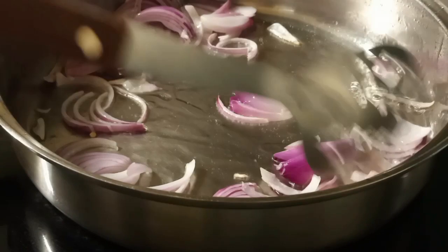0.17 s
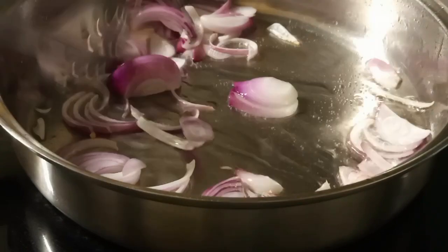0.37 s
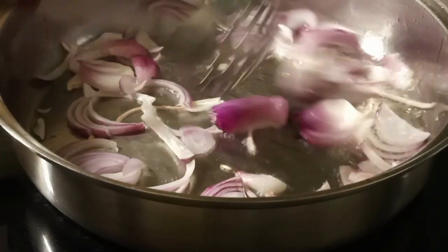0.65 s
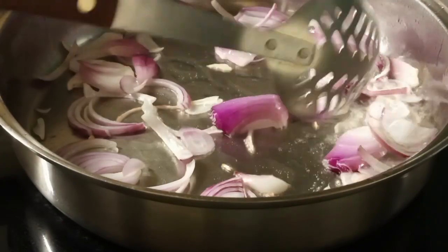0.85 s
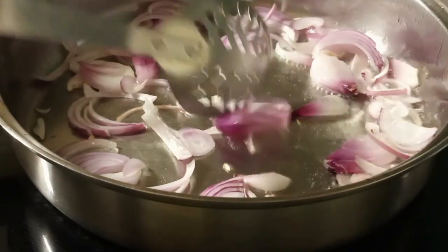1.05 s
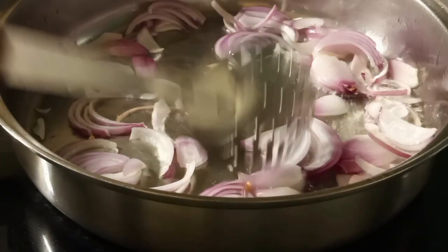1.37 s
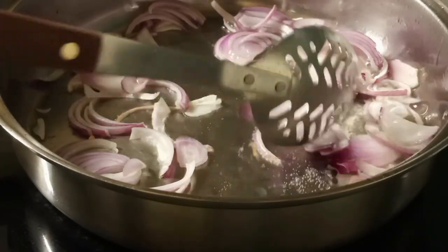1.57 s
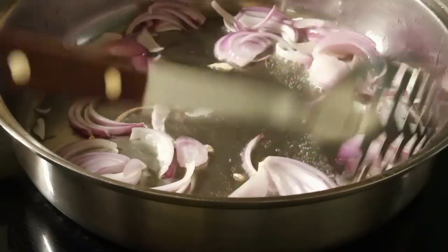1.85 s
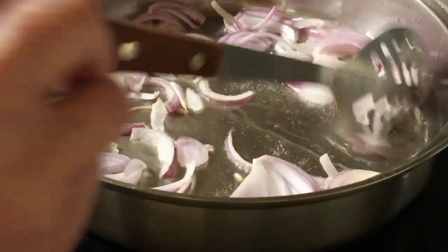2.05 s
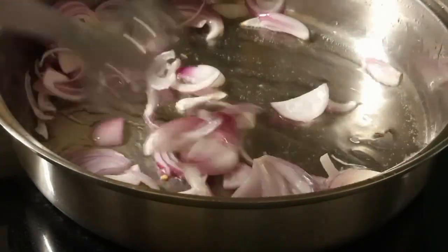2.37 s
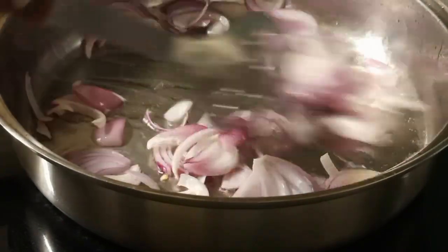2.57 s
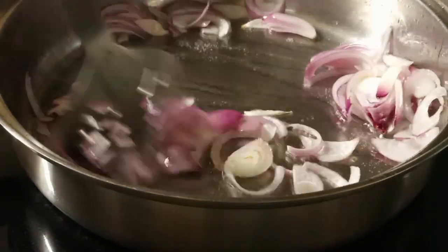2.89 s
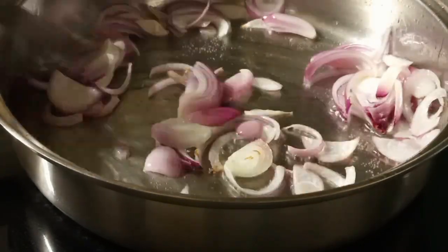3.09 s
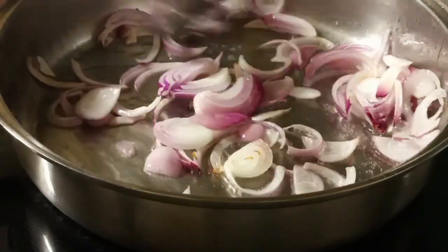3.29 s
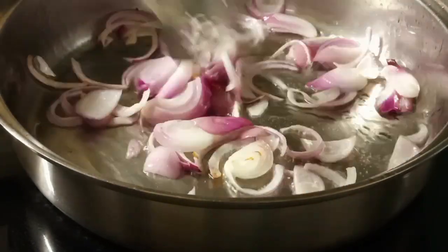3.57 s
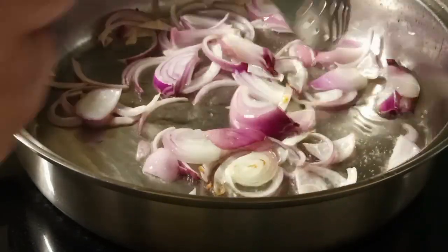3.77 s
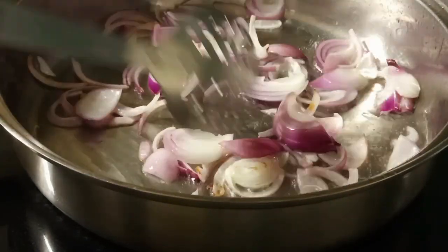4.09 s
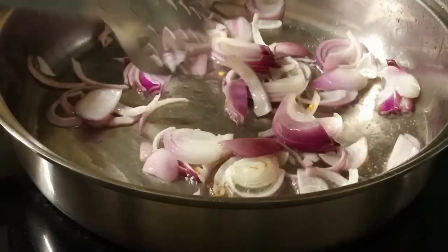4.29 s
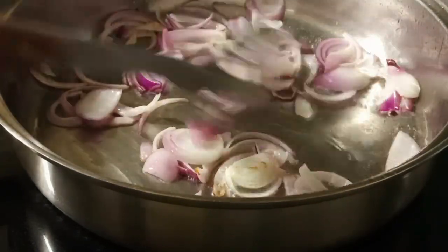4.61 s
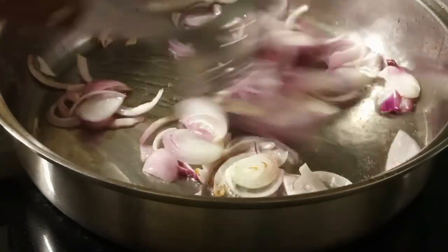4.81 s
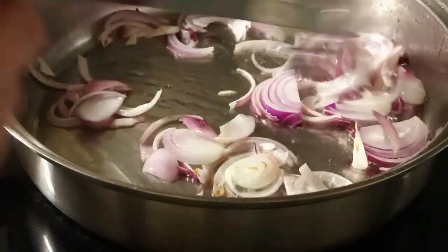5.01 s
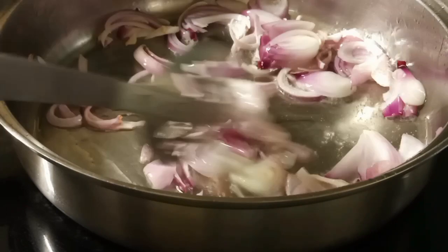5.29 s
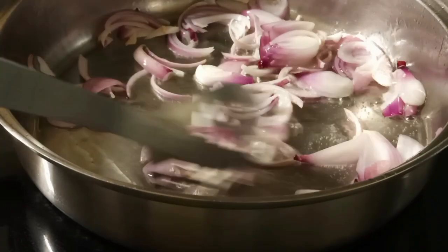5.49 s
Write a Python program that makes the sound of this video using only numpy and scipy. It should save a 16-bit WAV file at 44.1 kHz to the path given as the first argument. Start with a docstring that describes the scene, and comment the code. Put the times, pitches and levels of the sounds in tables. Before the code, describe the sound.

Sliced onions sizzle brightly in hot fat in a steel pan while a metal skimmer clinks, scrapes and shifts the pan on the stove.

```python
"""Small kitchen, close to the stove, two unlike microphones: the right one loses the top of the treble.
Sliced onions fry in a wide steel pan: hissing noise, bursting bubbles, crackles and loud spits of fat.
A slotted steel skimmer taps, pushes and scrapes: contact bursts drive the modes of pan wall and blade.
The pan grinds and squeaks on its stand as gritty noise bands, and dull bumps thud through the stove top.
Behind are short sparse reflections and a steady noise hum."""
import sys
import numpy as np
from scipy import signal
from scipy.fft import rfft, irfft
from scipy.io import wavfile
from scipy.ndimage import uniform_filter1d

SR = 44100
rng = np.random.default_rng(int(sys.argv[2]) if len(sys.argv) > 2 else 0)


def log_audio(samples):
    """Write samples as a 16-bit WAV file to the path given in sys.argv[1]."""
    # one column per channel
    frames = np.atleast_2d(samples).T
    # limit to full scale, then quantise
    limited = np.clip(frames, -1, 1)
    pcm = np.round(limited * 32767).astype(np.int16)
    wavfile.write(sys.argv[1], SR, pcm)


N = 249165

# Frying spectrum before the low fizz is added: hz [Hz], density_db [dB per Hz, relative]
FRYING_SPECTRUM = [(900, -31.5), (2000, -25), (3000, -15), (4000, -9), (5500, -4), (7000, -3.5), (8300, -4),
                   (9200, 5), (11000, -5), (13800, -17.5), (14400, -9.5), (15200, -1)]
# Lower fizz coming and going against the rest of the frying: time_s [s], level_db [dB]
LOW_FIZZ_LEVELS = [(0, 7), (.33, 6.5), (.82, 11), (1.5, 3.5), (2.0, 8), (2.4, 4.5), (2.6, 12.5),
                   (3.07, 7.5), (3.3, 6), (3.7, 6), (3.9, 6.5), (4.35, 7.5), (5.3, 7.5), (5.65, 18)]
# Loud spits of fat: start_s [s], peak_db [dB, main burst], centre_hz [Hz], burst_ms [ms, decay to 1/e]
FAT_SPITS = [(0.064, -22, 4120, 2.7), (0.376, -14.5, 8800, 2), (0.46, -18, 9350, 1.6),
             (1.5506, -24, 4800, 2.2), (1.9492, -25, 4770, 3), (1.997, -14.5, 8950, 1.6),
             (2.222, -18, 9080, 1.5), (2.8306, -20, 8500, 2.3), (2.8396, -25, 5940, 2.4),
             (2.9775, -21.5, 5760, 2.4), (3.178, -15, 4930, 1.4), (3.237, -23.5, 6000, 3.5),
             (3.242, -25, 2850, 5.6), (3.3665, -19.5, 4600, 4), (3.5995, -10, 9100, 1.8),
             (3.66, -21, 9670, 2.1), (3.797, -23, 5500, 1), (3.9545, -24, 6000, 0.8),
             (3.996, -16, 5530, 0.53), (4.151, -23.5, 6100, 2.7), (5.001, -20.5, 4700, 3.8),
             (5.012, -22, 5050, 1.5), (5.243, -16.5, 4830, 4.6), (5.435, -17.5, 5660, 1.8)]
# Sizzle flaring up as slices turn onto hot fat: start_s [s], length_s [s], level_db [dB], centre_hz [Hz]
SIZZLE_FLARES = [(0.06, 0.096, -40, 4260), (2.089, 0.042, -44.5, 3160), (3.302, 0.044, -37, 5730),
                 (3.392, 0.13, -39, 3870), (3.672, 0.12, -35, 4720), (5.445, 0.093, -46, 3400)]
# Skimmer meets pan: start_s [s], crack_peak_db [dB], ring_db [dB], ring_time [factor, at least 0.1 in use],
# then the three pan modes that the spot favours, strongest first: mode_1_hz, mode_2_hz, mode_3_hz [Hz]
SKIMMER_TAPS = [(0.267, -27, -38, 0.27, 3050, 2670, 1303), (1.002, -33, -61, 0.3, 790, 3120, 1020),
                (0.3136, -13.5, -48, 0.51, 3320, 790, 1580), (0.493, -27, -27.5, 0.12, 3476, 3380, 3988),
                (0.77, -18.5, -29.5, 0.12, 1860, 806, 4900), (0.9117, -14.5, -31.5, 0.1, 5150, 2050, 3192),
                (1.079, -15, -25, 0.25, 3540, 3180, 5185), (1.171, -42, -40, 0.14, 4670, 3540, 5400),
                (1.1775, -21, -39, 0.17, 5450, 4670, 3570), (1.309, -54, -40, 1.6, 2690, 1625, 302),
                (1.834, -20, -27.5, 0.76, 3540, 2300, 4060), (2.019, -39, -33, 0.87, 2156, 875, 1625),
                (2.406, -26, -43, 0.26, 3192, 6890, 2056), (2.415, -32, -24.5, 1.2, 3192, 6890, 2254),
                (2.6595, -19.5, -24, 0.51, 2300, 875, 2860), (2.781, -50, -37, 0.33, 2146, 1020, 875),
                (3.082, -21, -22, 0.52, 3126, 2220, 7095), (3.269, -23, -24, 0.38, 2070, 625, 1020),
                (4.026, -4.5, -25, 0.41, 5350, 875, 2254), (4.216, -7, -23, 0.3, 3192, 790, 7400),
                (4.393, -12, -22, 0.2, 5200, 3112, 7240), (4.546, -12, -28.5, 0.37, 2860, 1950, 5030),
                (4.73, -17, -32.5, 0.33, 2910, 1130, 5400), (5.083, -6.5, -28, 0.07, 5470, 3970, 2100),
                (5.377, -27, -29, 2.6, 2070, 3192, 3126), (5.568, -13.5, -24, 0.33, 2017, 3460, 2700)]
# Short strokes that ring the pan, edge drags and low knocks as the pan shifts: start_s [s], length_s [s],
# ring_db [dB], rasp_db [dB], favoured pan modes mode_1_hz, mode_2_hz, mode_3_hz [Hz]
PAN_STROKES = [(0.158, 0.089, -22.5, -40, 2690, 2056, 3830), (0.884, 0.06, -34, -32.5, 2765, 790, 5350),
               (0.919, 0.069, -36.5, -41, 1965, 1625, 2765), (0.98, 0.031, -24, -62, 790, 450, 1020),
               (1.525, 0.086, -28.5, -57, 450, 302, 614), (1.683, 0.024, -13.5, -58, 1010, 790, 875),
               (1.715, 0.099, -21, -53, 790, 875, 1020), (1.606, 0.073, -48, -35, 3476, 1965, 3988),
               (2.01, 0.11, -35, -42.5, 3988, 1625, 1303), (2.405, 0.11, -19, -33, 2070, 3900, 3476),
               (2.445, 0.069, -24, -40, 2070, 3476, 2765), (2.762, 0.044, -32.5, -47, 1020, 2254, 875),
               (3.068, 0.061, -25, -49, 3380, 3126, 2254), (3.1, 0.047, -33, -55, 3380, 1168, 1625),
               (3.083, 0.032, -34, -53, 3988, 2254, 3830), (3.266, 0.071, -26.5, -45, 2070, 1303, 3126),
               (4.039, 0.082, -30.5, -33, 5400, 875, 3830), (4.329, 0.05, -35.5, -31.5, 2056, 1625, 2254),
               (5.087, 0.092, -29.5, -30, 790, 3988, 2056), (5.363, 0.056, -22, -31, 2070, 3192, 2070),
               (5.405, 0.19, -40.5, -55, 2075, 2075, 3192), (5.578, 0.069, -30.5, -28, 3540, 3988, 1625)]
# Blade scraped flat over the bottom, one row a catch: start_s [s], length_s [s], ring_db [dB],
# rasp_db [dB against the ring], judder [factor], favoured blade modes mode_1_hz, mode_2_hz, mode_3_hz [Hz]
BLADE_SCRAPES = [(1.305, 0.055, -25, -15, 1.8, 2700, 3930, 5400),
                 (1.335, 0.037, -26, -9, 1.4, 3930, 2700, 5400),
                 (1.361, 0.073, -27.5, -3, 2.05, 5470, 3190, 6300),
                 (1.405, 0.085, -36.5, -7, 0.61, 3930, 5400, 2700),
                 (4.369, 0.059, -32, -11, 0.66, 5400, 3930, 2700),
                 (4.402, 0.041, -26.5, -14, 0.43, 5400, 2700, 2990),
                 (4.44, 0.069, -27.5, -8.5, 0.44, 2710, 5400, 7150),
                 (4.497, 0.071, -31.5, -13, 0.93, 3930, 2700, 5400)]
# Modes of the pan: pitch_hz [Hz]
PAN_MODE_HZ = [302, 450, 614, 790, 875, 1020, 1168, 1303, 1545, 1625, 1965, 2056, 2254, 2690, 2765, 2840,
               3126, 3192, 3380, 3476, 3540, 3830, 3988, 4650, 5030, 5350, 6570, 6890, 7400]
# Strength of each pan mode: level_db [dB, relative]
PAN_MODE_DB = [-10, -16, -12.5, -14, -6.5, -13.5, -9.5, -5, -8.5, -4.5, -8, -10, -5, -16.5, -5, -4, -4.5,
               -7, -4.5, -3.5, -9.5, -13, -9, -4.5, -7, -5.5, -2.5, -1.5, -1.5]
# Ring time of each pan mode, before a contact's own factor: t60_s [s]
PAN_MODE_T60 = [0.43, 0.11, 0.22, 0.16, 0.059, 0.13, 0.1, 0.83, 0.17, 0.61, 0.22, 0.4, 0.16, 0.33, 0.5,
                0.16, 0.034, 0.071, 0.25, 0.056, 0.17, 0.37, 0.51, 0.12, 0.072, 0.18, 0.025, 0.029, 0.03]
# Modes of the skimmer blade: pitch_hz [Hz], level_db [dB, relative], t60_s [s, before the scrape's factor]
BLADE_MODES = [(710, -5.5, .05), (4850, -5, .03), (5470, -7.5, 0.05), (6300, -13, .04), (1820, -1.5, 0.042),
               (2700, -2.5, 0.042), (2990, -13, 0.071), (3190, -10.5, 0.04), (3930, 3, 0.056),
               (5400, -2, 0.097), (5760, -37, 0.05), (7150, -5, 0.05)]
# Pan shifting on its stand: start_s [s], length_s [s], level_db [dB], start_hz [Hz], end_hz [Hz]
STAND_GRINDS = [(0.139, 0.1, -30, 350, 306), (0.962, .19, -27, 710, 746), (1.182, 0.1, -34, 625, 640),
                (1.318, 0.068, -43, 322, 716), (1.51, 0.14, -22, 373, 485), (1.661, 0.19, -18, 900, 470),
                (2.735, 0.12, -39.5, 1020, 940), (4.697, 0.12, -32.5, 800, 520),
                (5.095, 0.097, -29.5, 710, 640), (5.259, 0.18, -17.5, 360, 333)]
# Short squeaks: start_s [s], length_s [s], level_db [dB], start_hz [Hz], end_hz [Hz]
STAND_SQUEAKS = [(0.434, 0.18, -52, 425, 497), (0.562, 0.048, -33.5, 660, 650),
                 (4.799, 0.11, -34, 678, 920)]
# Dull bumps through the stove top: start_s [s], level_db [dB], pitch_hz [Hz]
STOVE_BUMPS = [(0.052, -48, 161), (0.179, -43, 142), (0.923, -28, 162.5), (1.079, -32.5, 188),
               (1.364, -48, 148), (1.547, -34, 181), (1.594, -34, 170), (1.707, -43, 121),
               (2.301, -40.5, 168), (2.878, -34.5, 158), (3.241, -43, 175), (3.479, -24, 166),
               (4.026, -42, 170), (4.542, -29, 155), (4.729, -40, 181), (4.925, -42.5, 184),
               (5.101, -37, 166), (5.312, -17.5, 167)]
# Kitchen hum spectrum: hz [Hz], density_db [dB per Hz, relative]
HUM_SPECTRUM = [(15, -47), (25, -10.5), (178, 1.5), (225, -60), (278, 0), (357, -6), (515, -17),
                (850, -4.5), (1110, -12.5), (2500, -13), (3250, -83), (5500, -120)]
# Left-right likeness of the noise beds: hz [Hz], likeness [0 to 1]
LIKENESS = [(60, 0), (160, 0), (270, 0.35), (500, 0.29), (1200, 0)]
# Right microphone against the left: hz [Hz], gain_db [dB]
RIGHT_MICROPHONE = [(60, -7), (160, 0.5), (300, -6), (550, -7), (900, -1), (1800, 2), (4200, 3.5),
                    (6000, 7.5), (7000, 1.5), (7600, -4.5), (8300, -80), (9200, -35), (12000, -18),
                    (15000, -18)]
# Treble edge of the whole sound: hz [Hz], gain_db [dB]
TREBLE_EDGE = [(15400, 0), (15800, -32)]

PAN = (PAN_MODE_HZ, PAN_MODE_DB, PAN_MODE_T60)
FRYING_DB, SETTLE_DB_PER_S = -33.5, -0.34
BUBBLES_PER_S, BUBBLES_DB = 700, -14.5
CRACKLES_PER_S, CRACKLE_DB = 38, -15.5
CONTACT_S, CLATTER_DB, CLATTER_S = 0.011, -16.5, 0.013  # the edge stays on the steel and rattles
RING_FREE_S, RING_DAMP_DB_PER_S = 0.066, -500  # a tap's ring fades quickly after a short free time
# The more a crack stands over the ring, the more modes share it and the rougher they are
FOCUS_DB, SPREAD_DB_PER_DB, RATTLE_PER_DB = 17, 0.5, 0.27
STROKE_RISE_S, STROKE_RISE_DB, STROKE_FALL_DB, RASP_FALL_DB = 0.018, -6.5, -21.5, -18.5
SCRAPE_RISE_S, SCRAPE_RISE_DB, SCRAPE_FALL_DB = 0.024, 0, -9
GRIND_RISE_S, GRIND_RISE_DB, GRIND_FALL_DB = 0.037, -33.5, -17
SQUEAK_RISE_S, SQUEAK_RISE_DB, SQUEAK_FALL_DB = 0.0267, -34, -32
REFLECTIONS_DB, HUM_DB = -11.0, -57.5
EDGE_HZ = 16650  # upper band limit


def frying():
    """A fine hiss, thousands of bursting steam bubbles and sparse crackles; the lower fizz comes and goes."""
    s, low_db = np.transpose(LOW_FIZZ_LEVELS)

    def colour_db(hz, t):
        return read(FRYING_SPECTRUM, hz) + np.interp(t, s, low_db) / (1 + (hz / 4500) ** 6)

    hiss = noise(colour_db, size=256, patchy_db=2.0, flicker_db=2.18)
    level = gain_of(FRYING_DB + SETTLE_DB_PER_S * np.arange(N) / SR)
    return level * (hiss + gain_of(BUBBLES_DB) * bubbles() + gain_of(CRACKLE_DB) * crackles(hiss))


def bubbles():
    """Each bursting steam bubble is a brief tone grain, one of forty kinds, slightly offset on the right."""
    sizes = gain_of(2.3 * np.minimum(rng.exponential(1, N), 5)) * (rng.random(N) < BUBBLES_PER_S / SR)
    kind, out = rng.integers(0, 40, N), np.zeros((2, N))
    for k, (place, cycles, lag) in enumerate(rng.random((40, 3))):
        hz = 2600 * gain_of(14.53 * place)
        t = np.arange(int(SR * (3 + 9 * cycles) / hz)) / SR
        grain = np.sin(2 * np.pi * hz * t) * np.hanning(len(t))
        grain *= gain_of(read(FRYING_SPECTRUM, hz)) * np.sqrt(hz / len(t))
        burst = signal.oaconvolve(sizes * (kind == k), grain)[:N]
        out += [burst, np.roll(burst, int(60 * lag) - 30)]
    return evened(out)


def crackles(hiss):
    """Sharp crackles come in flurries; each lifts the whole hiss for a moment."""
    clumps = gain_of(6 * evened(uniform_filter1d(rng.standard_normal(N), size=4000)))
    sizes = gain_of(4.2 * np.minimum(rng.exponential(1, N), 3))
    pops = sizes * (rng.random(N) < clumps * CRACKLES_PER_S / SR)
    lift = signal.lfilter([1], [1, -np.exp(-1 / (SR * 0.0015))], pops)
    return hiss * evened(lift)


def spits():
    """A drop of water explodes in the fat: a sharp wide tick, a short burst and a faint tail."""
    out, ms = np.zeros((2, N)), np.arange(900) / SR * 1000
    for s, db, hz, burst_ms in FAT_SPITS:
        one, other, third = rng.standard_normal((3, 2, len(ms)))
        other[:, 8] += 7  # the bang itself
        body = band(one, hz, 1530) + 0.4 * band(third, 6450, 2600)
        decay = np.exp(-ms / max(burst_ms, .3)) + 0.15 * np.exp(-ms / 6)
        tick = 0.61 * band(other, 8500, 3400) * np.exp(-ms / 0.71)
        burst = body * decay + tick
        add(out, s, gain_of(db) * burst / abs(burst).max(axis=1, keepdims=True))
    return out


def flares():
    """Slices turning onto hot fat give short swells of coarse sizzle, a gritty noise band."""
    out, t = np.zeros((2, N)), np.arange(6000) / SR
    for s, length, db, hz in SIZZLE_FLARES:
        level = gain_of(db) * swell(t, length, 0.014, -5, -6.0, hold=0.81)
        add(out, s, level * rasping(len(t), 1.3, hz, 2400))
    return out


def taps():
    """A short crack of steel on steel around the favoured modes, then the pan rings and the edge rattles."""
    out, t = np.zeros((2, N)), np.arange(3000) / SR
    drive = np.minimum(t / 0.0017, 1) * np.exp(-t / CONTACT_S)
    for s, crack_db, ring_db, lasting, *spot in SKIMMER_TAPS:
        spot = [min(PAN_MODE_HZ, key=lambda f: abs(f - hz)) for hz in spot]
        hard_db = max(crack_db - ring_db, 0)
        crack = tap_crack(t, spot)
        focus_db = FOCUS_DB - SPREAD_DB_PER_DB * hard_db
        ring = ringing(PAN, drive, spot, focus_db, lasting, waver=0.31 + RATTLE_PER_DB * hard_db)
        ring /= np.sqrt(uniform_filter1d((ring ** 2).mean(0), size=400).max())
        ring = damped(ring, RING_FREE_S)
        clatter = rasping(len(t), 3.5, 4000, 2400) * np.minimum(t / 0.0052, 1) * np.exp(-t / CLATTER_S)
        add(out, s, gain_of(crack_db) * crack + gain_of(ring_db + CLATTER_DB) * clatter)
        add(out, s, gain_of(ring_db) * ring)
    return out


def tap_crack(t, spot):
    """The blow itself: noise bands at the favoured modes, a wide band and a low band, all dying fast; peak 1."""
    one, other, third = rng.standard_normal((3, 2, len(t)))
    other[:, 30] += 6  # the first touch is one sharp blow
    crack = band(one, spot[0], 256) + 0.48 * band(one, spot[1], 213) + 0.47 * band(one, spot[2], 230)
    crack += 0.8 * band(other, 0.95 * max(spot), 0.98 * max(spot)) + 0.28 * band(third, 824, 340)
    decay = 3.9 * np.exp(-t / 0.0035) + 0.31 * np.exp(-t / 0.0034) + 0.041 * np.exp(-t / 0.026)
    crack *= np.minimum(t / 0.00068, 1) * decay
    return crack / abs(crack).max(axis=1, keepdims=True)


def pan_strokes():
    """Edge drags and low knocks of the shifting pan drive the pan modes, which fade quickly, and rasp."""
    out, t = np.zeros((2, N)), np.arange(6000) / SR
    for s, length, ring_db, rasp_db, *spot in PAN_STROKES:
        drive = gain_of(ring_db) * swell(t, length, STROKE_RISE_S, STROKE_RISE_DB, STROKE_FALL_DB, hold=0.93)
        ring = ringing(PAN, drive, spot, 16.9, 0.34, waver=0.42)
        add(out, s, damped(ring, 0.85 * length))
        rasp = rasping(len(t), 1.2, 2950, 4100)
        rasp_swell = swell(t, length, STROKE_RISE_S, STROKE_RISE_DB, RASP_FALL_DB, hold=0.77)
        add(out, s, gain_of(rasp_db) * rasp_swell * rasp)
    return out


def scrapes():
    """Friction on the bottom drives the modes of the blade, juddering, and rasps."""
    out, t = np.zeros((2, N)), np.arange(6000) / SR
    for s, length, db, rasp_db, judder, *spot in BLADE_SCRAPES:
        drive = gain_of(db) * swell(t, length, SCRAPE_RISE_S, SCRAPE_RISE_DB, SCRAPE_FALL_DB, hold=0.67)
        add(out, s, ringing(np.transpose(BLADE_MODES), drive, spot, 12.5, 0.4, waver=judder))
        add(out, s, drive * gain_of(rasp_db) * rasping(len(t), 2.5, 3340, 3200))
    return out


def grinds():
    """The pan base chatters over its stand: gliding hollow and wide bands of stick-slip noise."""
    out, t = np.zeros((2, N)), np.arange(9000) / SR
    for s, length, db, from_hz, to_hz in STAND_GRINDS:
        hz = np.interp(t, [0, length], [from_hz, to_hz])
        one, other, third = (gritty(len(t), 3.3) for _ in "abc")
        hollow = band(np.array([one, third]), hz, 300)
        wide = band(np.array([other, third]), 0.82 * hz, 870)
        deep = band(one + third, 166, 77)  # the stove top booms along, alike in both microphones
        catching = evened(uniform_filter1d(rng.standard_normal(len(t)), size=350))
        lumps = evened(gain_of(1.7 * catching))  # it catches and lets go
        level = gain_of(db) * swell(t, length, GRIND_RISE_S, GRIND_RISE_DB, GRIND_FALL_DB, hold=1.7)
        add(out, s, level * lumps * (0.32 * hollow + 0.52 * wide + 0.045 * deep))
    return out


def squeaks():
    """The pan squeaks on its stand: a narrow gliding noise band of unsteady level."""
    out, t = np.zeros((2, N)), np.arange(9000) / SR
    for s, length, db, from_hz, to_hz in STAND_SQUEAKS:
        hz = np.interp(t, [0, length], [from_hz, to_hz])
        squeak = band(rng.standard_normal((2, len(t))), hz, 90)
        level = gain_of(db) * swell(t, length, SQUEAK_RISE_S, SQUEAK_RISE_DB, SQUEAK_FALL_DB, hold=1.48)
        unsteady = gain_of(2.5 * evened(uniform_filter1d(rng.standard_normal(len(t)), size=200)))
        add(out, s, level * squeak * unsteady)
    return out


def bumps():
    """Knocks thud through the stove top: a low sine with noise below it, decaying 60 dB in 0.11 s."""
    out, t = np.zeros((2, N)), np.arange(9000) / SR
    for s, db, hz in STOVE_BUMPS:
        thud = np.sin(2 * np.pi * hz * t) + 0.39 * band(rng.standard_normal(len(t)), 0.51 * hz, 140)
        add(out, s, gain_of(db - 60 * t / 0.11) * (1 - np.exp(-t / 0.0083)) * thud[None])
    return out


def kitchen(x):
    """Short sparse reflections, other echo times for each microphone; the bass hardly echoes."""
    echoes = np.zeros((2, 9000))
    at = np.arange(200, 8980, 20) + rng.integers(0, 20, (2, 439))
    np.put_along_axis(echoes, at, rng.choice([-1., 1.], at.shape), axis=1)
    echoes *= gain_of(-60 * np.arange(9000) / SR / 0.15)  # 60 dB down in 0.15 s
    high = signal.sosfilt(signal.butter(2, 300, "high", fs=SR, output="sos"), x)
    return signal.fftconvolve(high, echoes / np.linalg.norm(echoes[0]), axes=1)[:, :N]


def room_hum():
    """The hum of the room: noise gathered in the low bands of its spectrum."""
    hum = noise(lambda hz, t: read(HUM_SPECTRUM, hz), size=1024, patchy_db=0.5, flicker_db=-1.0)
    return gain_of(HUM_DB) * hum


def ringing(modes, drive, favoured_hz, boost_db, lasting, waver):
    """Each mode of a steel body gathers contact energy and lets it die; the microphones see other phases."""
    hz, db, t60 = np.array(modes)
    above = np.maximum(np.log2(hz / max(favoured_hz)), 0)  # modes above the highest favoured one are weaker
    nearest = hz[abs(hz[:, None] - favoured_hz).argmin(axis=0)]
    favour = 0.84 * np.isin(hz, nearest) + 0.49 * (hz == nearest[0])  # the first one most
    share = gain_of(db + boost_db * favour - 10.6 * above)
    share /= np.linalg.norm(share)
    power = np.r_[drive ** 2, np.zeros(3000)]  # room for the ring to die
    t, out = np.arange(len(power)) / SR, np.zeros((2, len(power)))
    keeps = np.exp(-2 * np.log(1000) / (SR * max(lasting, .1) * t60))  # energy kept per sample
    for f, gain, keep in zip(hz, share, keeps):
        a, b = rng.standard_normal((2, len(t) // 300 + 2))
        # the contact catches and slips: level and phase wander
        wander = 1 + waver * np.interp(t * SR / 300, np.arange(len(a)), a + 1j * b)
        energy = signal.lfilter([1 - keep], [1, -keep], power)
        level = gain * np.sqrt(2 * energy / np.mean(abs(wander) ** 2))
        # each mode's level drifts slowly at random
        level *= gain_of(0.45 * np.interp(t, t[::1200], rng.standard_normal(len(t[::1200]))))
        # each mode's pitch wavers slightly at random
        bend = np.cumsum(np.interp(t, t[::1500], rng.standard_normal(len(t[::1500])))) / SR
        turns = f * (t + 0.0062 * waver * bend) + rng.random() + apart(0.13)
        out += (level * wander * np.exp(2j * np.pi * turns)).real
    return out * np.minimum(np.arange(len(t))[::-1] / 2000, 1)


def apart(spread):
    """Phase of a mode in each microphone, in turns: about a quarter turn between them."""
    return [[0], [rng.choice([-1, 1]) / 4 + spread * rng.standard_normal()]]


def damped(ring, free_s):
    """The ring fades quickly after a short free time."""
    return ring * gain_of(RING_DAMP_DB_PER_S * np.maximum(np.arange(ring.shape[1]) / SR - free_s, 0))


def gritty(count, spread_db):
    """Stick and slip: uneven clicks a few milliseconds apart over noise whose strength jumps."""
    jumps = evened(uniform_filter1d(rng.standard_normal(count), size=120))
    slips = (rng.random(count) < 260 / SR) * rng.standard_normal(count)
    return evened(rng.standard_normal(count) * gain_of(spread_db * jumps) + 0.63 * evened(slips))


def rasping(count, spread_db, hz, width):
    """Grit in a wide band, unrelated in the two microphones."""
    return band(np.array([gritty(count, spread_db), gritty(count, spread_db)]), hz, width)


def swell(t, length, rise, rise_db, fall_db, hold):
    """A stroke: the level climbs for the rise time, sinks to the end (late if hold is large), stops softly."""
    after = np.clip((t - rise) / max(length - rise, .01), 0, 1)
    db = rise_db * np.clip(1 - t / rise, 0, 1) + fall_db * after ** hold
    return gain_of(db) * np.clip(np.minimum(t, length - t) / 0.014, 0, 1)


def noise(colour_db, size, patchy_db, flicker_db):
    """Two-channel noise from random short-time spectra; colour_db(hz, t) shapes it."""
    hop = size // 4
    frames, hz = N // hop + 5, np.fft.rfftfreq(size, 1 / SR)[:, None]
    a, b, c, d, patches = rng.standard_normal((frames, len(hz), 5)).T
    patches = evened(uniform_filter1d(uniform_filter1d(patches, size=12, axis=0), size=28, axis=1))
    fast, slow = rng.standard_normal((frames, 2)).T
    fast, slow = evened(uniform_filter1d(fast, size=3)), evened(uniform_filter1d(slow, size=20))
    flicker = evened(fast + 0.5 * slow)
    same, left = np.clip(read(LIKENESS, hz), 0, 1), a + 1j * b
    z = np.array([left, same * left + np.sqrt(1 - same ** 2) * (c + 1j * d)])
    colour = colour_db(hz, np.arange(frames) * hop / SR)
    z *= gain_of(colour + patchy_db * patches + flicker_db * flicker)
    return evened(signal.istft(z, nperseg=size, noverlap=size - hop)[1][:, :N])


def resonate(x, hz, width):
    """A resonance of gain 1 that follows the curve hz."""
    turn = np.exp(2j * np.pi * np.cumsum(hz * np.ones(x.shape[-1])) / SR)
    r = np.exp(-np.pi * width / SR)
    return 2 * (turn * signal.lfilter([1 - r], [1, -r], x / turn + 1e-18)).real


def band(x, hz, width):
    """A steep band of rms 1, two resonances in a row."""
    return evened(resonate(resonate(x, hz, width), hz, width))


def gain_of(db):
    """Decibels to gain."""
    return 10 ** (np.asarray(db) / 20)


def evened(x):
    """Scales to rms 1."""
    return x / np.sqrt(np.mean(x ** 2) + 1e-20)


def read(points, hz):
    """Value of a spectrum table on a log-frequency axis."""
    f, value = np.transpose(points)
    return np.interp(np.log(hz + 1), np.log(f + 1), value)


def add(mix, s, sound):
    """Mixes a sound in at a time, in both channels."""
    part = mix[:, round(s * SR):][:, :sound.shape[1]]
    part += sound[:, :part.shape[1]]


def scene():
    """Fat, steel and stand with their reflections, over the frying and the hum of the room."""
    near = spits() + flares() + taps() + pan_strokes() + scrapes() + grinds() + squeaks() + bumps()
    return frying() + near + gain_of(REFLECTIONS_DB) * kitchen(near) + room_hum()


def record(dry):
    """Long waves reach both microphones alike; then come their colour, bass roll-off and an upper band limit."""
    hz, sound = np.fft.rfftfreq(N, 1 / SR), rfft(dry)
    alike = 0.88 / (1 + (hz / 210) ** 4)
    sound = (1 - alike) * sound + alike * sound.mean(0)
    colour = gain_of(read(TREBLE_EDGE, hz) + [0 * hz, read(RIGHT_MICROPHONE, hz)])
    bass_roll_off = hz ** 2 / (hz ** 2 + 55 ** 2)
    coloured = irfft(sound * colour * bass_roll_off, N)
    band_limit = signal.firwin(511, EDGE_HZ, window=("kaiser", 9), fs=SR)
    return signal.oaconvolve(coloured, band_limit[None], "same")


dry = scene()
out = record(dry)
log_audio(out)
```